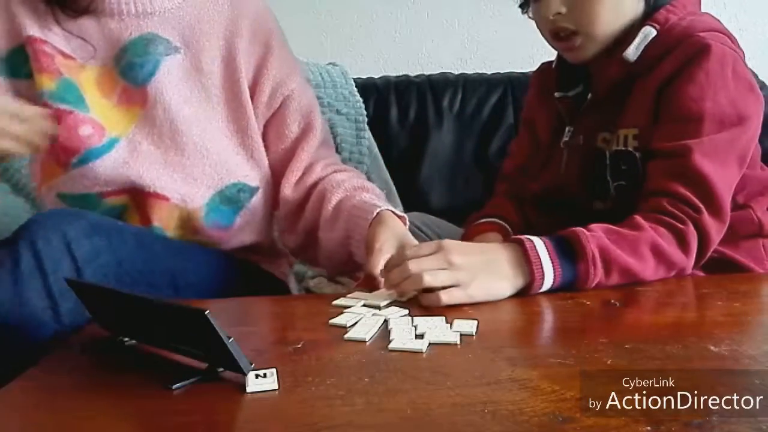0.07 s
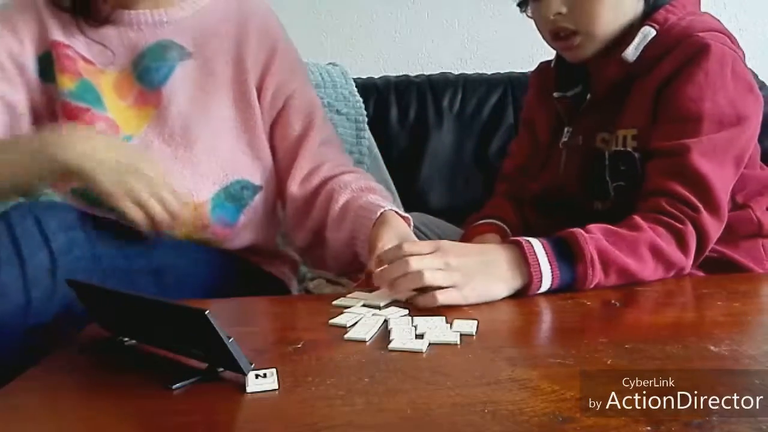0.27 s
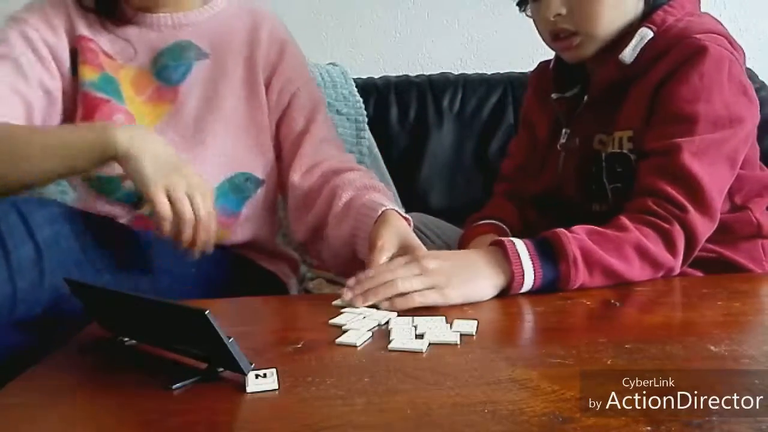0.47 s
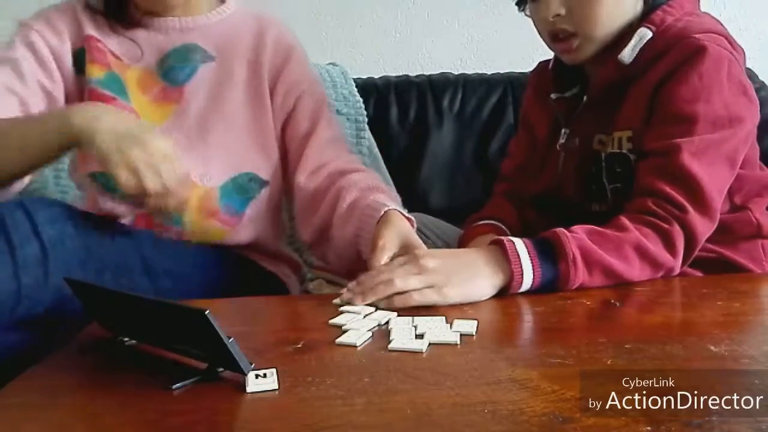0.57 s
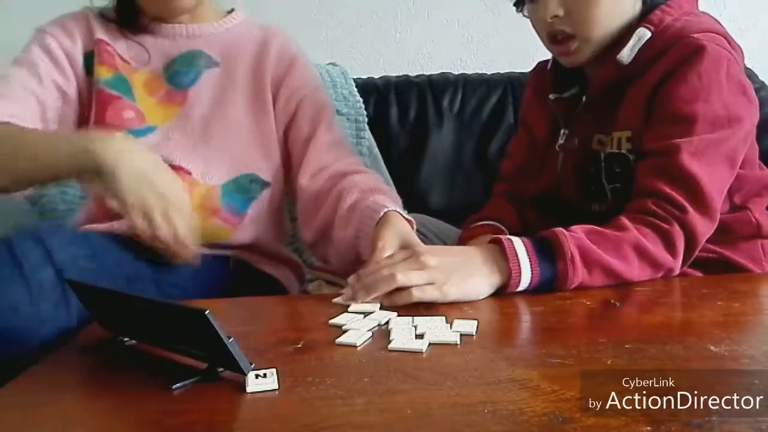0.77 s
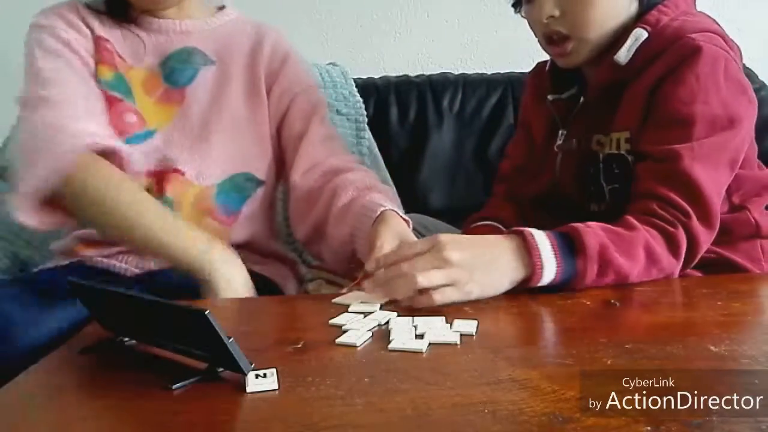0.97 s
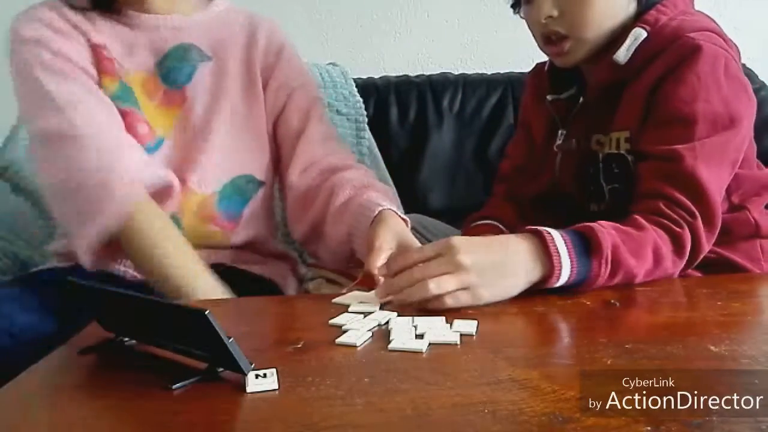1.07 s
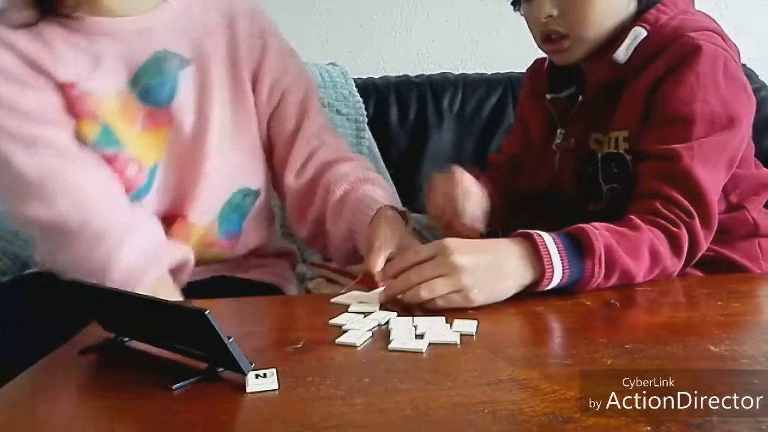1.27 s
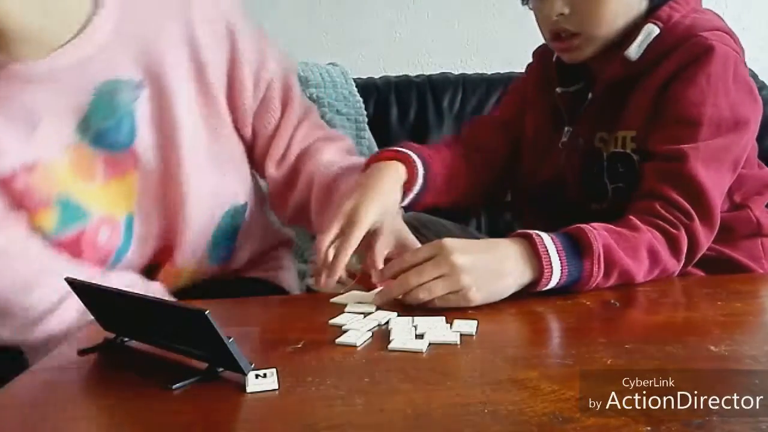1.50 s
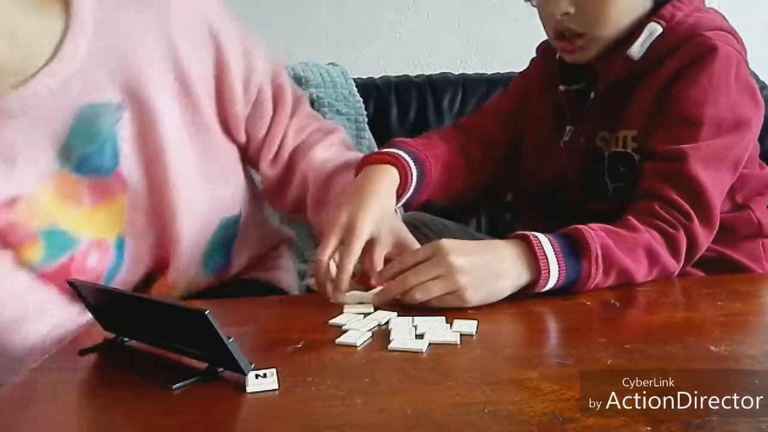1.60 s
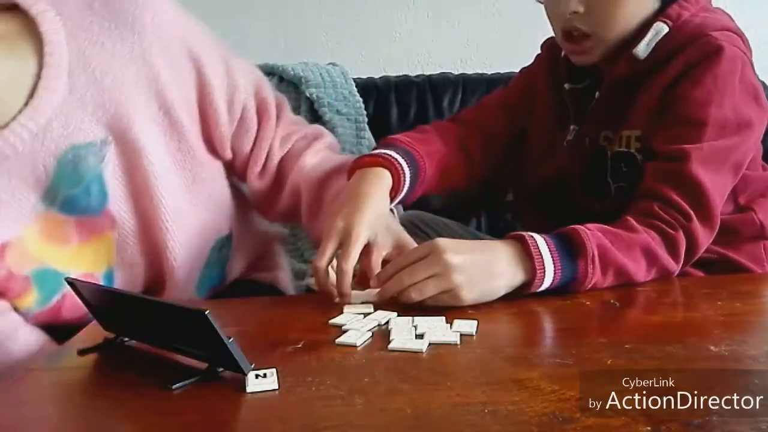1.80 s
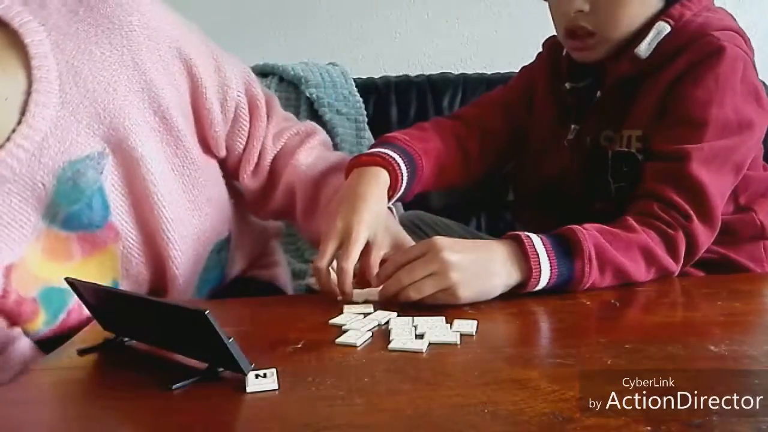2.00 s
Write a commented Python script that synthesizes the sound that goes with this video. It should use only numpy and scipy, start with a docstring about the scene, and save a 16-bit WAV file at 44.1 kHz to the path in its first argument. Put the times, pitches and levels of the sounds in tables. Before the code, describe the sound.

A small plastic game tile drops on a wooden table and rattles quickly to rest. Sleeves and hands then brush the top, and fingers lightly tap and nudge other tiles, heard up close in a quiet room.

```python
"""A small plastic game tile drops on a wooden table at 0.24 s. It rocks on its edges, each contact
cracking and ringing, and chatters to rest by 0.6 s while the top drums. Sleeves and hands then brush
the table. From 1.1 s fingers tap and nudge other tiles, and wrists bump and drag on the top.
Throughout: a quiet furnished room with a faint high whine, heard from a close stereo microphone."""
import sys
import numpy as np
from scipy import signal
from scipy.fft import rfft, irfft
from scipy.io import wavfile

SR = 44100
rng = np.random.default_rng(int(sys.argv[2]) if len(sys.argv) > 2 else 0)


def master_out(mix):
    """Clip the mix to full scale and print it as 16-bit PCM to the path in sys.argv[1]."""
    frames = np.transpose(np.atleast_2d(mix))
    ceiling = np.clip(frames, -1, 1)
    pcm = np.round(ceiling * 32767).astype(np.int16)
    wavfile.write(sys.argv[1], SR, pcm)


N = 90404
HARD_ONSET_S, CUSHIONED_ONSET_S = 0.0003, 0.00096
# strength of the rocking tile's contacts (time [s], level [dB])
ROCK_LEVELS = [(.255, -23.5), (0.274, -25), (0.284, -32.5), (.305, -18.5), (.345, -21.5), (.366, -23),
               (0.407, -23), (0.425, -30), (0.444, -29), (.47, -35.5), (.51, -43), (0.569, -56.5)]
# hiss of sleeves and skin on wood (frequency [Hz], level [dB])
HAND_HISS = [(1000, -32), (2500, -9), (3300, -3.5), (4000, -2), (5000, 3), (6100, 0), (7000, -4),
             (9000, -6), (11000, -26), (14000, -44)]


def dropped_tile(contacts, crack_t60_s=0.012, scrape_db=-17):
    """Each contact cracks and rings; the rocking edge scrapes in between."""
    # main impacts (time [s], crack [dB], ring [dB], low-pass [Hz], share of free ring time [ratio])
    clacks = [(0.2448, -35, -44, 4700, .3), (0.2474, -19.5, -17.5, 15500, 0.46),
              (.2497, -17, -18, 15000, 0.31), (.263, -39, -33, 12000, .8), (0.292, -18.5, -25, 9000, 0.21),
              (.3372, -22, -23, 12300, 0.51), (.3415, -24, -24, 11900, .6),
              (0.3745, -23, -13.5, 11700, 0.65), (0.3862, -14.5, -16, 19000, .45),
              (.396, -31, -28, 14000, 0.73), (0.443, -30, -24.5, 8400, 0.93)]
    # crack spectrum, left and right (frequency [Hz], level [dB])
    crack_left = [(60, -22.5), (250, -23), (700, -27.5), (1500, -11.5), (2700, -13.5), (4400, -5.5),
                  (6000, 7.5), (8000, -3), (11800, -19), (13000, 2.5), (13900, -26)]
    crack_right = [(60, -40), (250, -25), (700, -26), (1500, -16), (2800, -12.5), (4700, -5.5), (7000, 5.5),
                   (9800, 1.5), (11900, -7), (13000, 0), (13900, -19)]
    t = np.arange(N) / SR
    times, levels_db = np.array(ROCK_LEVELS).T
    scrape_gain = np.interp(t, times, undb(levels_db + scrape_db), left=0, right=0)
    cracks = rng.standard_normal((2, N)) * grit() * scrape_gain
    rings = np.zeros((2, N))
    bursts = rng.standard_normal((128, 2, 1024)) * fade(t[:1024], crack_t60_s)
    for (s, crack_db, ring_db, cutoff_hz, t60_share), burst in zip(clacks + contacts, bursts):
        add(cracks, s, undb(crack_db) * lowpass(burst, cutoff_hz))
        add(rings, s, undb(ring_db) * lowpass(tile_ring(t60_share), cutoff_hz))
    return rings + np.array([colour(cracks[0], crack_left), colour(cracks[1], crack_right)])


def tile_ring(t60_share, scatter_db=4, detune=0.0025, lag_rad=3.94, scatter_rad=0.53):
    """One ring of the tile; every contact point weights its modes differently."""
    # tile modes (frequency [Hz], level [dB], t60 [s], left minus right [dB])
    tile_modes = [(3217, -31, 0.052, -3), (3618, -27.5, 0.063, 0), (4940, -20, 0.039, 9),
                  (5420, -16, 0.052, 10), (5850, -25, 0.026, -3), (6410, -6.5, 0.042, 0.5),
                  (6490, -15.5, 0.041, -1), (7500, -24, 0.045, -13), (9500, -24, .035, -3),
                  (13000, -11, 0.03, 1), (13080, -15.5, 0.035, -4), (14020, -35, .035, 1)]
    t, ring = np.arange(4096) / SR, 0
    for hz, db, t60, pan_db in tile_modes:
        phase_draw, level_draw, pitch_draw = rng.standard_normal(3)
        lag = np.array([[0], [lag_rad + scatter_rad * phase_draw]])
        gain = undb(db + scatter_db * level_draw + np.array([[pan_db], [-pan_db]]) / 2)
        tone = np.sin(2 * np.pi * hz * (1 + detune * pitch_draw) * t - lag)
        ring = ring + gain * fade(t, t60 * t60_share) * tone
    return ring * rise(t, HARD_ONSET_S)


def rocking_contacts(start_per_s=134.96, end_per_s=259.2, jitter=0.2, bright_hz=12600, hz_per_db=174):
    """The settling tile's contacts get quicker, weaker and duller; columns as in clacks."""
    times, levels_db = np.array(ROCK_LEVELS).T
    s, contacts = times[0], []
    for gap_draw in rng.standard_normal(90):
        ring_db = np.interp(s, times, levels_db)
        crack_db = ring_db - 6
        cutoff_hz = bright_hz + hz_per_db * (ring_db - levels_db.max())
        if s < times[-1]:
            contacts.append((s, crack_db, ring_db, cutoff_hz, 1))
        rate_per_s = np.interp(s, times[[0, -1]], [start_per_s, end_per_s])
        s += np.exp(jitter * gap_draw) / rate_per_s
    return contacts


def table_top(contacts, onset_s=0.004, drum_fade_s=0.17):
    """The wooden top thumps under each blow and drums under the rocking tile."""
    # blows of tile, fingers and wrists (time [s], level [dB], pitch [Hz], t60 [s])
    bumps = [(0.246, -41, 213, 0.035), (0.266, -45.5, 228, 0.05), (0.2932, -42.5, 157.6, .07),
             (.310, -48.5, 193, 0.08), (.326, -51.5, 223, 0.04), (.695, -67, 323, 0.065),
             (1.126, -52.5, 115.6, .05), (1.127, -60, 261, 0.054), (1.366, -58, 136.5, 0.054),
             (1.413, -46.5, 115.4, 0.038), (1.524, -58.5, 97.3, 0.15), (1.565, -60, 113, 0.11),
             (1.601, -52.5, 193, 0.045), (1.722, -58.5, 114, 0.065), (1.787, -52.5, 105.3, 0.072),
             (1.873, -50.5, 103.6, 0.085), (1.911, -57, 113.7, 0.13), (2.043, -50, 146, 0.033)]
    # thump partials (multiple of pitch [ratio], level [dB])
    partials = [(1, 3.5), (1.45, -3.5), (2.05, -10.5), (2.8, -15.5)]
    # modes of the top (frequency [Hz], level [dB], t60 [s])
    top_modes = [(208.3, -31, 0.12), (300.4, -27.5, 0.047), (765, -33.5, 0.029), (1324, -26.5, 0.04)]
    t, out = np.arange(SR // 4) / SR, np.zeros((2, N))
    onset = rise(t, onset_s)
    for s, db, hz, t60 in bumps:
        thump = sum(undb(part_db) * np.sin(2 * np.pi * hz * ratio * t) for ratio, part_db in partials)
        add(out, s, undb(db) * 2 * thump * onset * fade(t, t60))
    drum = onset * sum(undb(db) * fade(t, t60) * np.sin(2 * np.pi * hz * t) for hz, db, t60 in top_modes)
    for s, _, db, *_ in contacts:
        # the flattening tile soon stops shaking the wood
        coupling = np.exp(-((s - contacts[0][0]) / drum_fade_s) ** 8)
        add(out, s, undb(db) * coupling * drum)
    return out


def tile_knocks():
    """Tiles knock dully on the wood, damped by the fingers."""
    # knocks (time [s], level [dB], pitch [Hz])
    knocks = [(0.148, -52, 1474), (0.2488, -36, 810), (.309, -42, 957), (0.2691, -35, 1461),
              (.301, -37, 1378), (1.125, -50, 1255), (1.366, -53, 1536), (1.7045, -42, 1180),
              (1.716, -52, 1287), (1.785, -56, 530), (1.8698, -46.5, 1340), (1.88, -52.5, 1240),
              (1.952, -49, 1190), (2.0465, -47.5, 970)]
    # damped modes (multiple of pitch [ratio], level [dB], t60 [s])
    knock_modes = [(.8, -8, 0.013), (1, 2.5, 0.018), (1.18, -8.5, 0.041), (1.6, -6, 0.018)]
    out = np.zeros((2, N))
    for s, db, hz in knocks:
        add(out, s, undb(db) * struck(knock_modes, hz, CUSHIONED_ONSET_S, scatter_rad=0.73))
    return out


def tile_clicks(tick_t60_s=0.0032):
    """A tile touches its neighbour: a tick and a brief ring."""
    # touches (time [s], level [dB], pitch [Hz], relative body [dB], relative tick [dB])
    clicks = [(0.0973, -45.5, 7230, -12, 5), (0.1118, -51.5, 6130, -23, -22), (.4957, -34, 6100, -12, 11.5),
              (1.638, -44.5, 7200, -30, -10), (1.772, -40.5, 6250, -3, -23), (2.015, -55.5, 5600, 4.5, 1)]
    # high ring and low body modes (multiple of pitch [ratio], level [dB], t60 [s])
    ring_modes = [(.87, -5, 0.018), (1, 2, 0.017), (1.42, -11.5, 0.0083), (1.68, -23, 0.0087)]
    body_modes = [(.26, -6.5, 0.016), (.41, -3, 0.018), (.58, -7, 0.016)]
    # tick spectrum (frequency [Hz], level [dB])
    tick_shape = [(100, -18), (1500, -26), (3200, -20), (4100, 13), (7500, 9.5), (10000, -22), (14000, -19)]
    t, out = np.arange(SR // 10) / SR, np.zeros((2, N))
    for s, db, hz, body_db, tick_db in clicks:
        burst = rng.standard_normal((2, len(t))) * fade(t, tick_t60_s)
        tick = np.array([colour(channel, tick_shape) for channel in burst])
        ring = struck(ring_modes, hz, HARD_ONSET_S, scatter_rad=0.7)
        body = struck(body_modes, hz, HARD_ONSET_S, scatter_rad=0.7)
        add(out, s, undb(db) * (ring + undb(body_db) * body + undb(tick_db) * tick))
    return out


def sleeve_brushes():
    """Sleeves and fingers rub lightly on the wood."""
    # strokes (start [s], attack [s], release [s], body [dB], hiss [dB])
    strokes = [(0.63, 0.15, 0.17, -59, -52), (0.73, 0.093, 0.1, -63.5, -78), (.81, .06, .11, -69.5, -64),
               (1.005, 0.13, 0.089, -67.5, -61.5), (1.358, 0.0073, 0.095, -66, -69.5),
               (1.86, 0.029, 0.25, -64.5, -87), (0.456, 0.048, 0.16, -63.5, -96)]
    # body spectrum (frequency [Hz], level [dB])
    body_shape = [(100, -35), (330, -5), (500, -2.5), (1100, 6), (1600, 4.5), (2500, -3), (4000, -9.5),
                  (8000, -32)]
    return rubbing(strokes, noise(body_shape), HAND_HISS)


def hand_sweep():
    """A hand rubs once across the table."""
    # stroke (start [s], attack [s], release [s], body [dB], hiss [dB])
    strokes = [(1.494, 0.024, 0.23, -54, -54.5)]
    # body spectrum (frequency [Hz], level [dB])
    body_shape = [(100, -12), (400, -29), (530, -1.5), (700, -6), (1150, -8), (1400, 4.5), (1750, -8),
                  (2300, 1), (2600, -4), (2900, 1.5), (3600, -9.5), (4100, -23)]
    return rubbing(strokes, noise(body_shape), HAND_HISS)


def tile_slides(creak_hz=522.7, slips_per_s=960):
    """Pushed tiles stick and slip unevenly, creaking and ringing against the wood."""
    # pushes (start [s], attack [s], release [s], creak [dB], ring [dB])
    strokes = [(.08, 0.013, 0.07, -69.5, -61), (.14, 0.035, 0.051, -56.5, -62),
               (.17, 0.074, 0.23, -72, -56), (1.94, 0.063, 0.046, -59.5, -71.5)]
    # modes of a pressed tile (multiple of pitch [ratio], level [dB], t60 [s])
    creak_modes = [(.8, -5, 0.063), (1, -0.5, 0.12), (2.27, -2.5, 0.037), (3.5, -1.5, 0.025)]
    # ring spectrum (frequency [Hz], level [dB])
    ring_shape = [(2000, -5), (4000, -4), (5200, -2), (5900, -4), (6450, 7.5), (7200, -5.5), (9000, -11),
                  (14000, -47)]
    slips = (rng.random(N) < slips_per_s / SR) * rng.standard_normal(N)
    slip_ring = struck(creak_modes, creak_hz, CUSHIONED_ONSET_S, scatter_rad=0.62)
    creak = signal.fftconvolve(slips[None], slip_ring, axes=1)[:, :N]
    return rubbing(strokes, creak / creak.std(), ring_shape)


def wrist_drags():
    """Dragging wrists make the table rumble."""
    # drags (start [s], attack [s], release [s], level [dB])
    drags = [(1.35, 0.032, .08, -57), (1.5, 0.078, 0.41, -59), (1.85, 0.043, 0.41, -64.5)]
    # rumble spectrum (frequency [Hz], level [dB])
    rumble_shape = [(50, -18), (100, 2.5), (230, -6), (330, -11), (600, -35.5)]
    return noise(rumble_shape) * sum(undb(db) * swell(*timing) for *timing, db in drags)


def near_echoes(x):
    """Table top, bodies and sofa add quick reflections that colour the sound."""
    # reflections (left delay [ms], right delay [ms], level [dB])
    echoes = [(2.36, 1.735, -15.5), (3.77, 3.455, -10), (7.06, 6.58, -16)]
    out = x.copy()
    for *delays_ms, db in echoes:
        for channel, ms in enumerate(delays_ms):
            lag = int(ms * SR / 1000)
            out[channel, lag:] += undb(db) * x[channel, :-lag]
    return out / np.sqrt(1 + sum(undb(db) ** 2 for *_, db in echoes))


def room(x, wet_db, t60_s=0.16, delay_s=0.004, low_cut_hz=400):
    """Adds the short reverberation of a furnished room."""
    t = np.arange(SR // 2) / SR
    tail = rng.standard_normal((2, len(t))) * fade(t, t60_s) * (t > delay_s)
    tail /= np.linalg.norm(tail, axis=1, keepdims=True)
    return x + undb(wet_db) * signal.fftconvolve(x, highpass(tail, low_cut_hz), axes=1)[:, :N]


def background(air_db=-69):
    """Room air and a faint electrical whine."""
    # air spectrum and whine tones (frequency [Hz], level [dB])
    air_shape = [(25, -12), (55, -15), (100, 3), (150, -6), (210, -2), (300, -8), (450, -11.5), (700, -8),
                 (1400, -11), (2500, -13.5), (4500, -12.5), (7200, -12), (8700, -16.5), (14000, -19.5)]
    tones = [(6957, -86.5), (7016, -81)]
    t = np.arange(N) / SR
    whine = sum(undb(db) * np.sin(2 * np.pi * hz * t) for hz, db in tones)
    return undb(air_db) * noise(air_shape) + whine


def struck(modes, hz, onset_s, scatter_rad):
    """Short modal ring, slightly out of phase between the channels."""
    t, ring = np.arange(SR // 10) / SR, 0
    for ratio, db, t60 in modes:
        phase = scatter_rad * rng.standard_normal((2, 1))
        ring = ring + undb(db) * fade(t, t60) * np.sin(2 * np.pi * hz * ratio * t + phase)
    return ring * rise(t, onset_s)


def rubbing(strokes, body, hiss_shape):
    """Friction strokes: a low body and a high hiss swell and fade together."""
    hiss = noise(hiss_shape)
    return grit() * sum(swell(*timing) * (undb(body_db) * body + undb(hiss_db) * hiss)
                        for *timing, body_db, hiss_db in strokes)


def grit(depth_db=2.5, rate_hz=499.3):
    """Rapid uneven catching of two surfaces, as a unit-RMS gain."""
    position = np.arange(N) / SR * rate_hz
    gain = undb(depth_db * np.interp(position, np.arange(N), rng.standard_normal(N)))
    return gain / np.sqrt(np.mean(gain ** 2))


def noise(shape):
    """Unit-RMS coloured stereo noise, alike in the bass."""
    # left-right likeness (frequency [Hz], correlation [-1..1])
    likeness = [(100, 0.98), (250, 0.73), (600, -0.49), (2000, 0.19), (5000, 0.022), (12000, -0.041)]
    correlation = np.clip(at_bins(likeness, N), -1, 1)
    spectra = rfft(rng.standard_normal((2, N))) * undb(at_bins(shape, N))
    mid, side = spectra * np.sqrt([1 + correlation, 1 - correlation])
    x = irfft([mid + side, mid - side], N)
    return x / x.std()


def colour(x, shape):
    """Minimum-phase filter of unit power with a (Hz, dB) shape."""
    cepstrum = irfft(np.log(undb(at_bins(shape, 1024))))
    cepstrum[1:512] *= 2
    cepstrum[513:] = 0
    impulse = irfft(np.exp(rfft(cepstrum)))
    return signal.fftconvolve(x, impulse / np.linalg.norm(impulse))[:len(x)]


def at_bins(points, size):
    """(Hz, value) points interpolated over log frequency at the FFT bins."""
    hz, value = np.array(points, float).T
    return np.interp(np.log(np.arange(size // 2 + 1) * SR / size + 1), np.log(hz), value)


def lowpass(x, hz):
    return signal.sosfilt(signal.butter(2, hz, fs=SR, output="sos"), x)


def highpass(x, hz):
    return signal.sosfilt(signal.butter(2, hz, "high", fs=SR, output="sos"), x)


def swell(start_s, attack_s, release_s):
    """Speed of a stroke: it gathers and dies away."""
    peak_s = start_s + attack_s
    return np.interp(np.arange(N) / SR, [start_s, peak_s, peak_s + release_s], [0, 1, 0]) ** 1.245


def rise(t, onset_s):
    return 1 - np.exp(-(t / onset_s) ** 2)


def fade(t, t60_s):
    return np.exp(-np.log(1000) * t / t60_s)


def undb(db):
    return 10 ** (np.asarray(db) / 20)


def add(out, start_s, x):
    i = int(start_s * SR)
    out[:, i:i + x.shape[-1]] += x[..., :max(N - i, 0)]


def scene():
    """Tiles and hands on the table, in the room."""
    friction = near_echoes(sleeve_brushes() + hand_sweep() + tile_slides())
    contacts = rocking_contacts()
    quiet_layers = background() + friction + wrist_drags()
    impacts = table_top(contacts) + tile_knocks() + near_echoes(dropped_tile(contacts))
    return quiet_layers + room(impacts, wet_db=-7) + room(tile_clicks(), wet_db=-8)


def record(dry):
    """The microphone sheds the deepest bass; the recorder cuts the top."""
    low_hz, top_hz = 44.5, 14400
    top_cut = signal.ellip(10, 0.2, 80, top_hz, fs=SR, output="sos")
    return signal.sosfilt(top_cut, highpass(dry, low_hz))


dry = scene()
out = record(dry)
master_out(out)
```